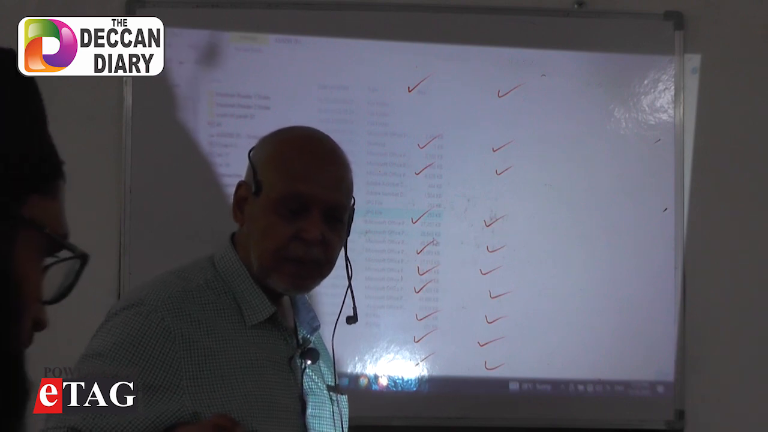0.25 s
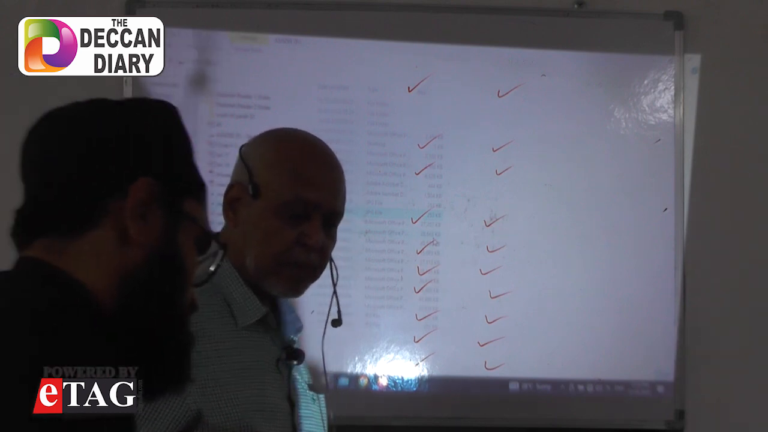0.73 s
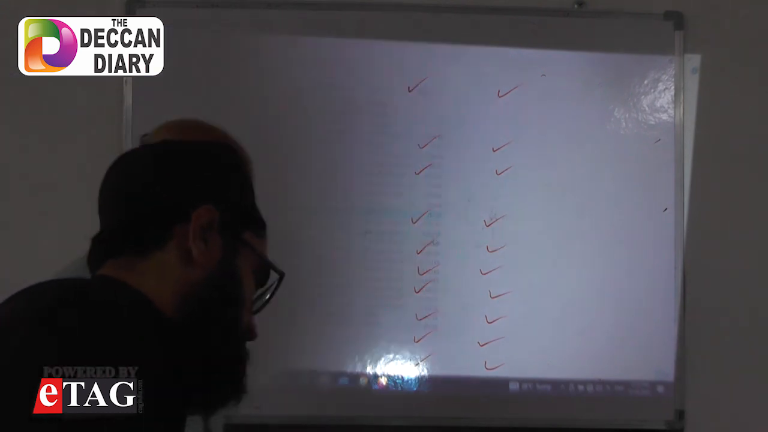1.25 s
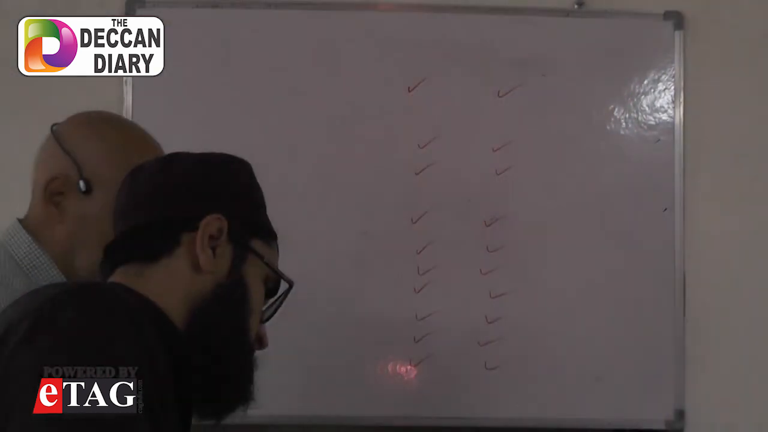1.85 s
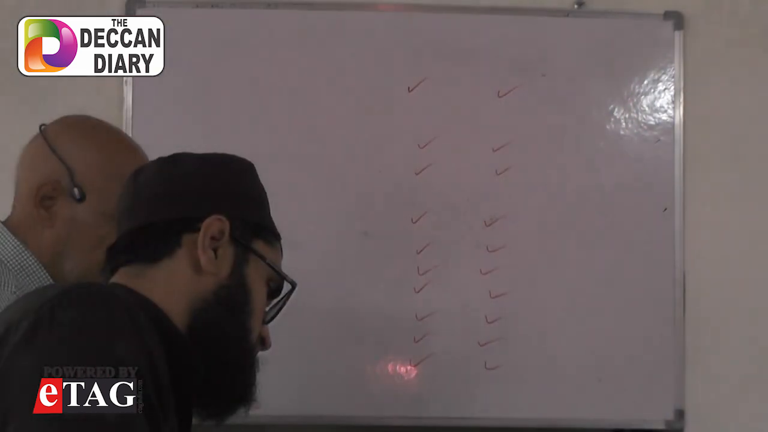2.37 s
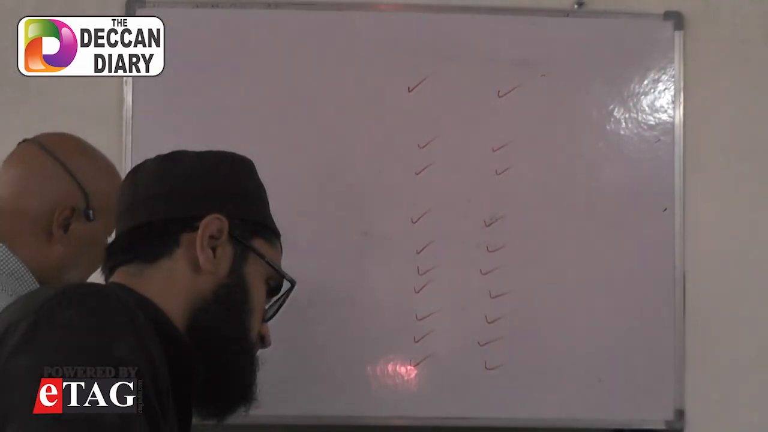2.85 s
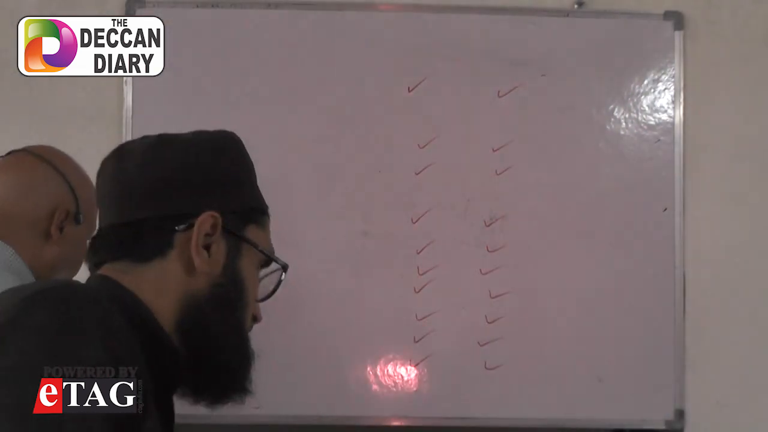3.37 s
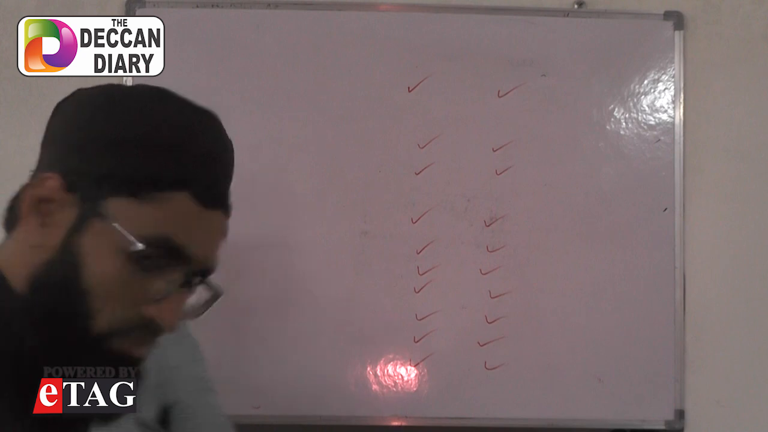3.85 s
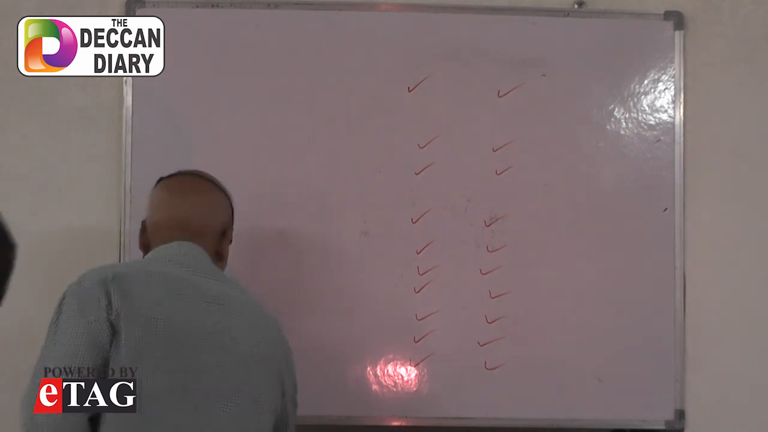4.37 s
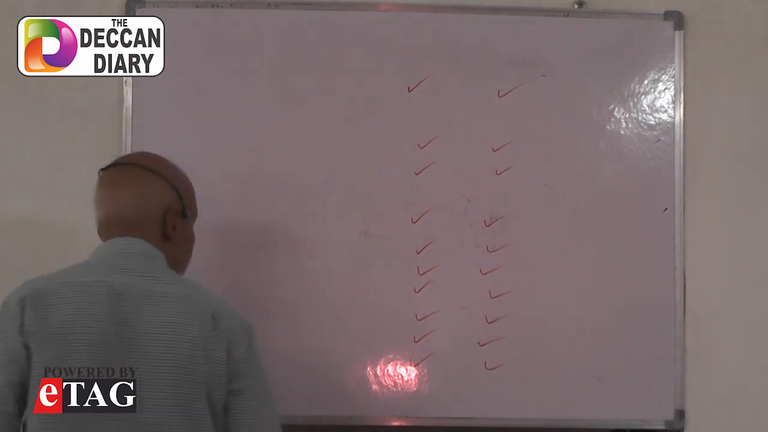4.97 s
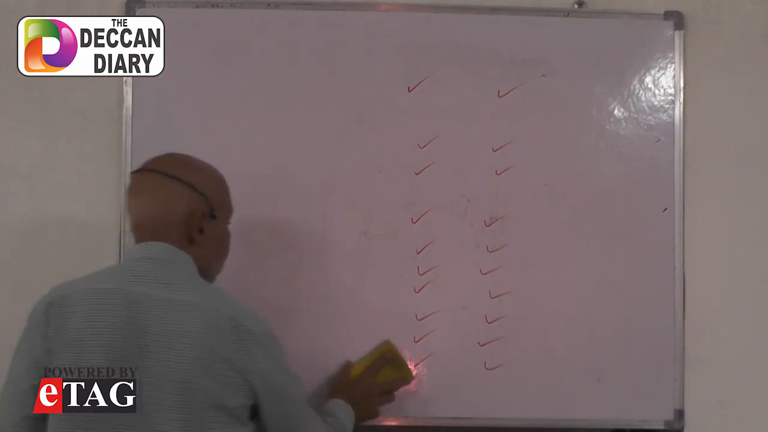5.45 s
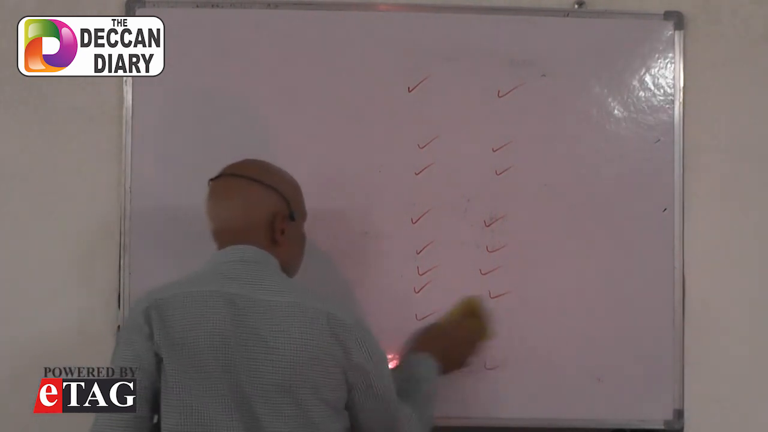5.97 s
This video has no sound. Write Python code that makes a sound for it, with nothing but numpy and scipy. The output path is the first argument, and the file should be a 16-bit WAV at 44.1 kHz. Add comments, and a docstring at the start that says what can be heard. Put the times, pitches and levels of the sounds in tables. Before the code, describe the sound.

A loud, steady electrical hum on a clip-on microphone, broken by sharp pops and thuds from a loose contact, with faint cloth brushing.

```python
"""Humming clip-on mic in a classroom

A loud mains hum on the microphone lead sits over the room's air and a few faint squeaks.
As the wearer turns and starts to wipe a whiteboard, a loose contact pops and thuds.
The big pops duck the line through a limiter, and hum and air swell back.
Cloth and duster brush softly; the lead ticks against the shirt and rumbles at a step."""
import sys
import numpy as np
from scipy import signal
from scipy.fft import rfft, irfft
from scipy.io import wavfile

SR = 44100
rng = np.random.default_rng(int(sys.argv[2]) if len(sys.argv) > 2 else 0)


def output_pcm(signal):
    """Save a mono or channel-first signal as 16-bit PCM at the path in sys.argv[1].

    Samples are clipped to [-1, 1] before scaling.
    """
    pcm = np.clip(np.atleast_2d(signal).T, -1, 1) * 32767
    wavfile.write(sys.argv[1], SR, np.round(pcm).astype(np.int16))


N = 273861

MAINS_HZ, FIRST_CREST_S = 49.912, .0046
# Partials of the mains hum: harmonic number, relative level/dB
HUM_PARTIALS = [(1, -16.5), (2, -44.5), (3, -31), (4, -48), (5, -39.5), (6, -55), (7, -48.5), (8, -58),
                (9, -56), (11, -69.5), (12, -70), (13, -69.5), (17, -59.5), (22, -59.5), (23, -72.5),
                (25, -75.5), (26, -68.5), (27, -67.5), (33, -71.5), (35, -74.5), (36, -75), (38, -70),
                (51, -82)]
def hum(waver=0.13, odd_lag_rad=0.73):
    """Mains pickup: odd harmonics make a leaning triangle wave; the high buzz is out of step and wavers."""
    out, drift_times = np.zeros(N), np.linspace(0, N / SR, 60)
    phase = mains_phase()
    for k, db in HUM_PARTIALS:
        lag = odd_lag_rad * (k > 1) if k % 2 else np.pi / 2   # even harmonics are a quarter cycle off
        lag += rng.uniform(0, 2 * np.pi) * (k > 9)
        drift = np.interp(clock(), drift_times, rng.standard_normal(len(drift_times)))
        depth = waver * np.log10(k)
        out += np.sqrt(2) * from_db(db) * (1 + depth * drift) * np.cos(k * phase - lag)
    return out


# Breaks of the loose contact: t/s, pop drive level/dB, thud level/dB, knock f/Hz
CONTACT_BREAKS = [(0.0906, 4, -12, 560), (0.2702, 6, -14.5, 350), (2.5477, 4, -43, 298),
                  (2.6475, 0.5, -41, 560), (2.7091, -6.5, -38, 400), (3.0617, 2, -13.5, 370),
                  (3.745, 0, -17, 457), (4.4893, -7, -46, 400), (4.505, -2.5, -20.5, 200),
                  (5.3503, 0, -30, 450)]
def pops(pop_s=0.011, stretch=0.83, coupling_hz=22, line_cut_hz=3500,
         snap_db=-38.5, snap_hz=950, snap_s=0.00011, crackle_db=-50, crackle_s=0.0042):
    """Each break of the contact kicks the line; the coupling capacitors swing it back below zero."""
    kicks, sparks = np.zeros(N), np.zeros(N)
    for start, db, *_ in CONTACT_BREAKS:
        length = pop_s * from_db(stretch * db)   # a bigger pop lasts longer
        snap = from_db(snap_db) * edge(start, snap_hz, snap_s)
        kicks += from_db(db) * swell(start, length) + snap
        sparks += from_db(db + crackle_db) * swell(start, crackle_s)
    crackle = band(sparks * rng.standard_normal(N), snap_hz, high_hz=12000, order=1)
    return band(kicks, coupling_hz, line_cut_hz) + crackle


def thuds(boom_hz=92, boom_s=0.012, boom_lag_s=0.0031, sag_depth=0.41, sag_lag_s=0.012, sag_s=0.031,
          knock_db=-9, knock_cycles=0.74, reclose_s=0.00501, reclose_db=-6,
          rumble_db=-30, rumble_s=.06, wobble_db=-23, wobble_s=.14):
    """The weight under each pop: a hollow double knock and short boom, then a sag, rumble and wobble."""
    hits, rumble_env, wobble_env = np.zeros(N), np.zeros(N), np.zeros(N)
    for start, _, thud_db, knock_hz in CONTACT_BREAKS:
        t = clock() - start - boom_lag_s
        boom = np.exp(-(t / boom_s) ** 2) * np.cos(2 * np.pi * boom_hz * t)
        sag = sag_depth * swell(start + sag_lag_s, sag_s)
        hits += from_db(thud_db) * (boom - sag)
        knock_s = knock_cycles / knock_hz
        opening = edge(start, knock_hz, knock_s)
        closing = from_db(reclose_db) * edge(start + reclose_s, knock_hz, knock_s)
        hits += from_db(thud_db + knock_db) * (opening - closing)   # the contact shuts with a reverse knock
        rumble_env += from_db(thud_db + rumble_db) * swell(start, rumble_s)
        wobble_env += from_db(thud_db + wobble_db) * swell(start, wobble_s)
    rumble = noise_band(low_hz=170, high_hz=404)
    wobble = noise_band(low_hz=17, high_hz=45.5)
    return hits + rumble_env * rumble + wobble_env * wobble


# Strokes of cloth and duster: t/s, length/s, centre f/Hz, level/dB
STROKES = [(0.594, 0.5, 7500, -68.5), (1.645, 0.036, 2900, -55.5), (1.68, 0.061, 2700, -50),
           (3.81, 0.061, 1600, -48.5), (4.997, 0.062, 3900, -63), (5.617, 0.067, 6630, -63.5),
           (5.605, 0.22, 3130, -64)]
def brushes(short_s=.06, short_octaves=0.61, octaves_per_doubling=.28):
    """Cloth and duster brush softly; the longer the stroke, the broader its band."""
    out = np.zeros(N)
    for start, length, hz, db in STROKES:
        octaves = max(short_octaves + octaves_per_doubling * np.log2(length / short_s), .2)
        spread = 2 ** (octaves / 2)
        out += from_db(db) * rub(start, length, hz / spread, hz * spread)
    return out


def rub(start, length, low_hz, high_hz, grain=0.099):
    """Fibres catch and slip: a swell of grainy noise in one band."""
    slips = rng.standard_normal(N) * np.exp(grain * rng.standard_normal(N))
    return swell(start, length) * rms_one(band(slips, low_hz, high_hz))


# Tiny ticks of the lead: t/s, level/dB
CABLE_TICKS = [(1.521, -61), (1.682, -61), (3.278, -67)]
def cable(step_db=-41):
    """The lead ticks against the shirt and rumbles as the wearer steps up to the board."""
    ticks = sum(from_db(db) * rub(start, length=.012, low_hz=3800, high_hz=14000)
                for start, db in CABLE_TICKS)
    step = from_db(step_db) * rub(start=3.955, length=.6, low_hz=31, high_hz=76)
    return ticks + step


# Faint squeaks in the room: t/s, length/s, f/Hz, level/dB
ROOM_SQUEAKS = [(2.24, 0.26, 1720, -54.5), (3.35, 0.33, 4330, -76.5), (3.606, 0.25, 1260, -54)]
def squeaks(width_hz=34):
    """Thin, unsteady tones fade in and out from across the room."""
    out = np.zeros(N)
    for start, length, hz, db in ROOM_SQUEAKS:
        tone = noise_band(hz - width_hz / 2, hz + width_hz / 2)
        fade = np.sin(np.pi * np.clip((clock() - start) / length, 0, 1))
        out += from_db(db) * fade * tone
    return out


# Colour of the room tone and hiss: f/Hz, relative level/dB
AIR_COLOUR = [(20, -2.5), (45, 3), (90, -3), (200, -4), (380, -3), (700, -7), (1100, -9.5), (2000, -19),
              (3300, -25.5), (4600, -34), (7000, -39), (10000, -44), (15000, -48)]
def air(throb=0.027):
    """A bed of dark room tone and hiss, throbbing slightly with the mains."""
    hz, db = np.transpose(AIR_COLOUR)
    bin_hz = np.maximum(np.arange(N // 2 + 1) * SR / N, 1)
    colour = from_db(np.interp(np.log(bin_hz), np.log(hz), db))
    bed = rms_one(irfft(rfft(rng.standard_normal(N)) * colour, N))
    return bed * (1 + throb * np.cos(mains_phase()))


def limiter(x, ceiling_db=-13.0, attack_s=0.0002, release_s=0.25):
    """The gain ducks fast on a peak and creeps back."""
    over_db = np.maximum(20 * np.log10(np.abs(x) + 1e-9) - ceiling_db, 1e-9)
    fade = clock() / release_s
    duck_db = np.exp(np.maximum.accumulate(np.log(over_db) + fade) - fade)   # decaying peak hold
    pole = np.exp(-1 / (attack_s * SR))
    return x * from_db(-signal.lfilter([1 - pole], [1, -pole], duck_db))


def mains_phase():
    """Phase of the mains in radians, zero at the first crest."""
    return 2 * np.pi * MAINS_HZ * (clock() - FIRST_CREST_S)


def edge(at, hz, half_length_s):
    """A transient: one brief swing from below zero to above."""
    t = clock() - at
    return np.exp(-(t / half_length_s) ** 2) * np.sin(2 * np.pi * hz * t)


def swell(start, length):
    """An envelope of height 1 with a quick rise and a smooth tail."""
    u = np.clip((clock() - start) / length, 0, 1)
    return 27 / 4 * u * (1 - u) ** 2


def noise_band(low_hz, high_hz):
    """Band-passed noise with an rms of 1."""
    return rms_one(band(rng.standard_normal(N), low_hz, high_hz))


def band(x, low_hz, high_hz, order=2):
    """Butterworth band-pass."""
    edges = np.clip([low_hz, high_hz], 10, .47 * SR)
    return signal.sosfilt(signal.butter(order, edges, "band", fs=SR, output="sos"), x + 1e-18)


def from_db(db):
    """Decibels to gain."""
    return 10 ** (np.asarray(db) / 20)


def rms_one(x):
    """Scale to an rms of 1."""
    return x / np.sqrt(np.mean(x ** 2) + 1e-20)


def clock():
    """The time of every sample, in seconds."""
    return np.arange(N) / SR


# Slow swing of the background as the wearer moves: t/s, level/dB
BACKGROUND_SWING = [(0, 0.5), (.7, 0.5), (1.2, 5), (2.4, 0.5), (3.1, -2.5), (5.1, -2.5), (6.2, -1.1)]
def scene(hum_db=-0.23, air_db=-41.5, hum_swing_share=0.71):
    """Everything shares one limited mono mic line, except the thuds, which are layered on top."""
    swing_db = np.interp(clock(), *np.transpose(BACKGROUND_SWING))
    mains = from_db(hum_db + hum_swing_share * swing_db) * hum()
    room = from_db(air_db + swing_db) * air()
    line = mains + room + brushes() + cable() + squeaks() + pops()
    return (limiter(line) + thuds())[None]


def record(dry, ceiling=0.41, cutoff_hz=15800):
    """A soft clip flattens the loudest crests, and a steep low-pass takes off the top end."""
    clipped = dry / (1 + np.abs(dry / ceiling) ** 10) ** (1 / 10)
    return signal.sosfilt(signal.ellip(10, .1, 90, cutoff_hz, fs=SR, output="sos"), clipped)


dry = scene()
out = record(dry)
output_pcm(out)
```